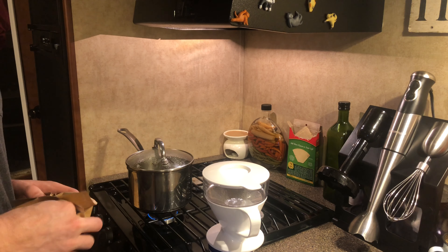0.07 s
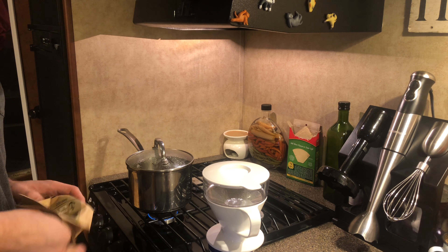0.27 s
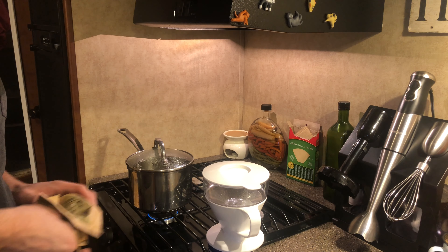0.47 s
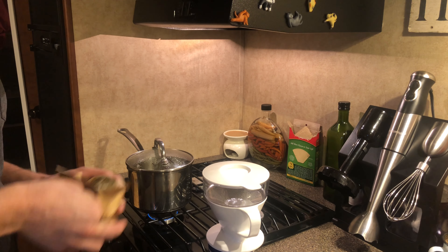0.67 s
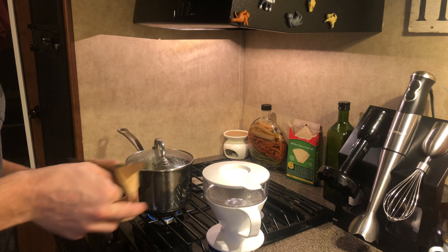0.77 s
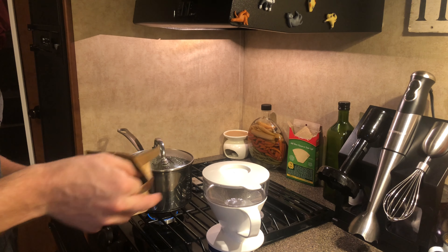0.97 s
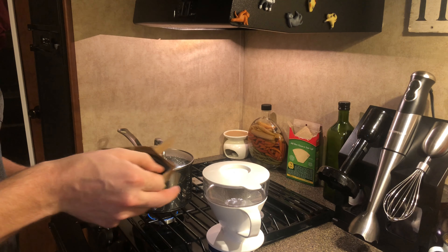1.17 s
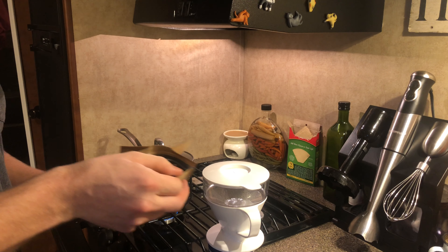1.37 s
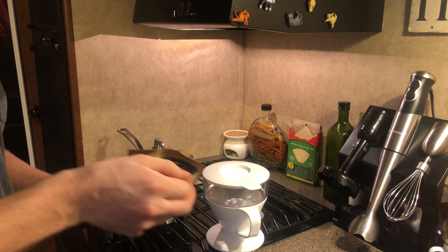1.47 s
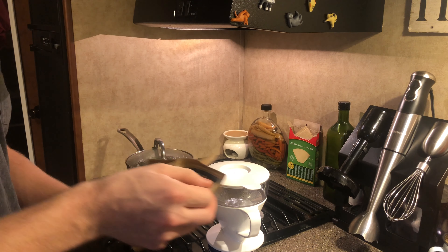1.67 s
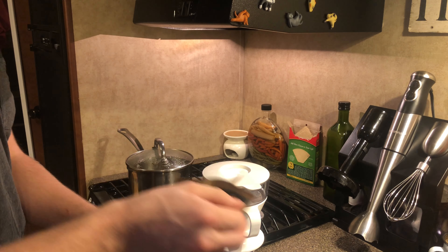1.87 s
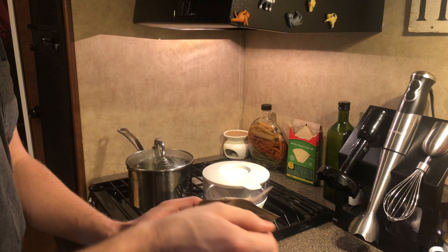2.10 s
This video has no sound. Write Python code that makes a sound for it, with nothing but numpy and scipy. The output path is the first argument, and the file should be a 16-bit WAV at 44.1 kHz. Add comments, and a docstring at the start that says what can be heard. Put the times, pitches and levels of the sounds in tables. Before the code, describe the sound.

A stiff paper packet is unfolded close by, in mono, in a small, hard-walled kitchen. Bright creases snap hard from 0 to 0.65 seconds, strongest near 0.18 and 0.5, with dense rustle, scuffs and hollow panel pops. Lighter crackles follow, with a sharp snap at 0.9 and a popping flap at 1.25. Then only soft gas hiss and low hum remain, with a faint tick near 2.07, before silence at 2.14.

```python
"""Sharp creases snap as hands unfold a stiff paper packet of coffee, heard in mono in a small hard-walled kitchen.
Between the snaps the paper rustles, ticks and scuffs on itself, and its panels flap with a dull pop.
Snaps and pops are clicks and grains exciting resonances; rustle and scuffs are dense grains in bands.
A near surface throws the sharp sounds back a few ms later, and a short reverberation follows.
A gas ring and a low hum, made of noise bands and narrow resonances, lie underneath."""
import sys
import numpy as np
from scipy import signal
from scipy.io import wavfile

SR = 44100
rng = np.random.default_rng(int(sys.argv[2]) if len(sys.argv) > 2 else 0)


def rack_gain(trim_db):
    """Turn a fader trim in dB into the linear factor to multiply a signal by."""
    fader = np.asarray(trim_db, float)
    return 10 ** (fader / 20)


def int16_out(signal):
    """Quantize to a 16-bit WAV file."""
    q = np.round(np.clip(np.atleast_2d(signal).T, -1, 1) * 32767)
    wavfile.write(sys.argv[1], SR, q.astype(np.int16))


N = 94197  # length in samples

# Spectrum of gas ring and hum. Each row: frequency in Hz, relative density in dB per Hz.
AIR_SPECTRUM = [(15, -46.5), (25, -10.5), (74, -6.5), (177, -14), (232, -18), (273, -18.5), (538, -22.5),
                (878, -26.5), (1060, -22.5), (1550, -30.5), (1830, -24), (2530, -30), (2750, -30.5),
                (13600, -43.5), (16500, -54)]
# Loudness of that background. Each row: time in seconds, rms level in dB.
AIR_LOUDNESS = [(0, -56), (1.3, -59.5), (1.65, -59), (2.13, -57.5)]
# Faint whistles of the gas ring. Each row: pitch in Hz, ring time (60 dB) in ms, rms level in dB.
GAS_WHISTLES = [(1110, 63, -74), (1536, 25, -71.5)]
# A hand bumps the packet. One row: start in seconds, level of the ring before its low-pass in dB,
# pitch in Hz, ring time (60 dB) in ms.
HAND_THUMP = (0.36, -40, 118, 80)

# The packet's levels in the tables below are dry, ahead of the room, the low cut and the editing fade.
# Rustle of the paper. Each row: time in seconds, rms level of its middle in dB, of its treble in dB,
# of its low end in dB.
RUSTLE_LEVELS = [(0.0, -39.5, -50.5, -52), (0.064, -46, -53, -55), (0.184, -35.5, -42.5, -51.5),
                 (0.25, -34, -40.5, -44), (0.374, -36.5, -43.5, -47), (0.472, -40, -45.5, -49),
                 (0.616, -40, -46.5, -48), (0.742, -43, -45, -57), (1.048, -50.5, -61, -64.5),
                 (1.146, -57, -63, -62.5), (1.28, -52.5, -69, -62), (1.36, -64, -72, -52)]
# Colour of the rustle within each of its three ranges. Each row: frequency in Hz, density in dB per Hz.
RUSTLE_SPECTRUM = [(120, -42), (200, -8), (548, -5.5), (950, -2), (1910, -1.5), (2050, 7.5), (2510, -2.5),
                   (3620, -4.5), (14300, -30), (16000, -47)]
# Soft scuffs of paper on paper. Each row: start in seconds, rms level before the swell in dB,
# centre in Hz, width in octaves, length in ms.
PAPER_SCUFFS = [(0.213, -23.5, 2260, 1.2, 2.7), (0.323, -27.5, 2300, 2.13, 8.3),
                (.376, -37, 2730, 0.77, 4.7), (0.392, -36.5, 1970, 0.2, 12), (.432, -32.5, 1400, 2.43, 34),
                (.522, -33.5, 1890, 1.9, 14.5), (0.706, -34.5, 2170, 0.83, 13),
                (.817, -28.5, 2090, 0.24, 6.4), (0.877, -40.5, 3540, 0.57, 10),
                (.945, -44, 1860, 0.39, 13.6), (1.169, -48, 1680, 0.52, 23), (1.200, -50.5, 2520, 2.4, 11),
                (1.215, -55.5, 1490, 0.57, 19), (1.304, -50.5, 940, 2.9, 27), (1.792, -63, 3500, 1, 23),
                (1.884, -64, 3110, 0.2, 61), (1.9, -69, 3500, 2.2, 26), (2.053, -56.5, 1780, 1.9, 27)]
# Panels that pop in or out. Each row: start in seconds, peak in dB, pitch in Hz,
# ring time (60 dB, held to 8..26) in ms.
PANEL_POPS = [(.015, -34, 554, 12), (.178, -23, 580, 16), (0.2136, -17.5, 410, 11), (.217, -19.5, 343, 18),
              (.324, -22.5, 580, 8.3), (.328, -21, 810, 21), (0.434, -32, 715, 15), (.538, -28.5, 650, 16),
              (.912, -36, 820, 30), (0.957, -39.5, 473, 29), (1.002, -36, 850, 37), (1.018, -37, 890, 34),
              (1.072, -36.5, 850, 41), (1.113, -40, 845, 34), (1.2475, -24, 720, 20),
              (1.2535, -22.5, 320, 32), (1.27, -35.5, 696, 8)]
# Creases that snap. Each row: start in seconds, peak in dB, ringing pitch in Hz, gain of the broad crack
# in dB, low edge in octaves below the ring, ring time (60 dB) in cycles, tearing decay (to 1/e) in ms.
CREASE_SNAPS = [(0.0111, -12.5, 6500, -4, 0.58, 2.8, 1.5), (0.014, -12, 3520, 3.5, 0.51, 9.7, 1.5),
                (.038, -16.5, 2240, -29, 0.26, 1.7, 4.3), (0.0971, -23, 3500, -12, 0.42, 2.1, 4.7),
                (.175, -5.5, 2710, -3, 0.4, 2.9, 2.8), (0.177, -13.5, 3700, -16, 0.74, 18, 2.2),
                (.254, -10, 4540, 26, 0.76, 1.6, 2.7), (0.405, -18, 4940, -11, 0.75, 3.7, 4.3),
                (0.5031, -6.5, 5080, 10, 0.24, 9.8, 0.52), (.506, -9.5, 4930, -2, 0.42, 7.1, 0.74),
                (.514, -33, 12500, -1, .3, 10, 1), (.528, -34, 12500, -6, .3, 10, 1),
                (0.6328, -15, 1430, -4.5, 0.35, 8.1, 1.2), (0.6373, -18, 1404, -22, 0.12, 6, 2.5),
                (.739, -29, 12500, -10, .2, 14, 1), (0.744, -27.5, 6030, 16, 1.1, 2.3, 16),
                (.766, -31, 9400, -10, 0.51, 5, 1.1), (.771, -22, 1550, 3.5, 0.63, 2.7, 4),
                (0.786, -25.5, 3500, -11, 2.9, 3.3, 1.9), (0.811, -24, 2280, 4, 1.4, 2.1, 3.9),
                (0.877, -38, 8000, -11, 1.5, 3.6, 4.9), (0.9066, -14.5, 5540, -3, 2.85, 8.6, 3.1),
                (0.943, -35, 5840, 16, 1.5, 8.3, 2.7), (0.981, -31, 6000, 20, 2.8, 5, 6.3),
                (0.9999, -27.5, 1300, 13, 0.36, 7.2, 6.9), (1.0103, -21, 4800, -17, 2.16, 3.8, 3.3),
                (1.068, -24.5, 1320, 6.5, 0.48, 7, 6.9), (1.07, -29, 2086, -6.5, 0.96, 8.6, 11.6),
                (1.109, -27.5, 3630, 42, 1.2, 3.8, 7.1), (1.151, -42, 12500, 0, 0.29, 11, 2.8),
                (1.158, -38, 6300, 10, 0.29, 6.1, 4), (1.2471, -22.5, 5220, -3, 2.06, 12, 3.9),
                (1.250, -18.5, 3800, 9, 2.3, 14, 2), (1.277, -38, 13000, -9, 0.25, 10, 1.3),
                (2.047, -46.5, 12900, 2, 1.24, 4.7, 1.1), (2.071, -30, 2200, 21, 1.8, 21, 1.3)]

# Near surfaces. Each row: delay in ms, level re the direct sound in dB.
NEAR_ECHOES = [(3.7, -8), (6.1, -12), (9.3, -13), (13.0, -15)]
# Reverberation of the kitchen. Each row: frequency in Hz, decay time (60 dB) in seconds, relative level in dB.
ROOM_DECAY = [(298, 0.08, -12), (810, 0.6, -6), (1490, 0.13, -1.5), (3800, 0.083, 4), (10400, 0.29, 4.5),
              (16600, .1, 0)]

AIR_FLICKER_DB, AIR_FLICKER_HZ = 1, 5
GRAINS_PER_S, GRAIN_SPREAD_DB, GRAIN_CYCLES = 9000, 3, 9.8  # the rate before clumping
CLUMP_DB, CLUMP_RATE_HZ = 3, 60
TICKS_PER_S, TICK_CYCLES = 140, 5.0
TICK_DB = 15  # re the rustle's middle, for the smallest and lowest ticks
POP_PUSH_MS = 2.5  # decay to 1/e
POP_OVERTONE, POP_OVERTONE_DB = 1.77, -8  # frequency ratio, level re the low mode
TEAR_DB, TEAR_GRAINS_PER_S = -14, 8000  # the level is re the first click
CRACK_TOP_HZ = 6820
RING_SPLIT = 0.1  # a crease rings at two pitches this share apart
ECHO_SMEAR_MS, ECHO_TOP_HZ = 0.5, 7000
ROOM_DB, ROOM_RISE_MS = -9, 1.3  # the tail's energy re the direct sound, and its build-up
PAPER_LOW_CUT_HZ = 292  # so small a thing radiates no bass
# An editing fade turns down the packet and its reverberation, and lifts at the end time.
FADE_S, FADE_FALL_S, FADE_DB, FADE_END_S = 1.306, 0.053, -18.5, 1.7
TOP_STOP_HZ, TOP_TRACE_DB = 16000, -50  # above the stop only a trace passes
SILENT_FROM_S = 2.136


def rms_one(x):
    """Scale to unit rms."""
    return x / np.sqrt(np.mean(x ** 2) + 1e-20)


def at_hz(points, hz, axis=1):
    """Read a column of a spectrum table on a log-frequency axis."""
    p = np.array(points)
    return np.interp(np.log(hz), np.log(p[:, 0]), p[:, axis])


def butter(x, order, hz, kind="low"):
    """Butterworth filter."""
    return signal.sosfilt(signal.butter(order, hz, kind, fs=SR, output="sos"), x)


def drift(rate):
    """Slow random wander with spread 1: noise smoothed twice at a corner of rate Hz."""
    hop = 40  # drawn at every 40th sample, joined by lines
    r = np.exp(-2 * np.pi * rate * hop / SR)
    noise = rng.standard_normal(N // hop + 2002)
    slow = signal.lfilter([1], [1, -2 * r, r * r], noise)[2000:]  # past the filter's start
    return np.interp(np.arange(N) / hop, np.arange(len(slow)), rms_one(slow))


def ring(clicks, hz, t60):
    """A two-pole resonance: a unit click starts a dying sine of height about 1."""
    r = rack_gain(-60 / (t60 * SR))
    w = 2 * np.pi * hz / SR
    return signal.lfilter([0, np.sin(w)], [1, -2 * r * np.cos(w), r * r], clicks + 1e-18)


def grains(per_s, spread_db, size):
    """Random clicks of uneven size and sign."""
    sizes = rack_gain(spread_db * np.minimum(rng.exponential(1, size), 4))
    signs = rng.choice([-1, 1], size)
    return sizes * signs * (rng.random(size) < per_s / SR)


def add(out, s, sound):
    """Mix a sound in at time s."""
    i = max(int(s * SR), 0)
    out[i:i + len(sound)] += sound[:len(out) - i]


def air():
    """Gas ring and hum: third-octave bands of noise, each with its own slight flicker."""
    out = 0
    edges = 18 * 2 ** np.arange(0, 10, 1 / 3)
    # Neighbouring bands draw on different noises; the first half second lets the filters settle.
    white = rng.standard_normal((2, N + SR // 2))
    for k, (low, high) in enumerate(zip(edges, edges[1:])):
        band = butter(white[k % 2], 2, [low, high], "band")[-N:]
        level_db = at_hz(AIR_SPECTRUM, np.sqrt(low * high))
        out = out + band * rack_gain(level_db + AIR_FLICKER_DB * drift(AIR_FLICKER_HZ))
    s, db = np.transpose(AIR_LOUDNESS)
    return rms_one(out) * rack_gain(np.interp(np.arange(N) / SR, s, db))


def whistles():
    """Noise in narrow resonances gives the gas ring its faint wavering pitches."""
    out = np.zeros(N)
    for hz, ms, db in GAS_WHISTLES:
        out += rack_gain(db) * rms_one(ring(rng.standard_normal(N), hz, ms / 1e3))
    return out


def thump():
    """The bump of a hand: one soft low ring."""
    s, db, hz, ring_ms = HAND_THUMP
    click = np.zeros(N)
    click[int(s * SR)] = rack_gain(db)
    return butter(ring(click, hz, ring_ms / 1e3), 2, 2 * hz)


def rustle():
    """Clumped grains are dealt to many small paper resonances."""
    s, middle_db, treble_db, low_db = np.transpose(RUSTLE_LEVELS)
    t = np.arange(N) / SR
    rate = GRAINS_PER_S * rack_gain(CLUMP_DB * drift(CLUMP_RATE_HZ))
    clicks = grains(rate, GRAIN_SPREAD_DB, size=N)
    dealt = rng.integers(0, 16, N)
    parts = np.zeros((3, N))  # low end, middle, treble
    for k, hz in enumerate(np.geomspace(230, 15500, 48)):
        one = ring(clicks * (dealt == k % 16), hz, GRAIN_CYCLES / hz)
        part = int(hz > 900) + int(hz > 4000)
        # sqrt(hz): each resonance is as wide as its pitch is high
        parts[part] += rms_one(one) * np.sqrt(hz) * rack_gain(at_hz(RUSTLE_SPECTRUM, hz))
    mix = np.zeros(N)
    for part, level_db in zip(parts, (low_db, middle_db, treble_db)):
        mix += rms_one(part) * rack_gain(np.interp(t, s, level_db))
    return mix * (t < s[-1])


def ticks():
    """Tiny creases snap at random, each ringing at one of twelve pitches; their level follows the rustle."""
    s, middle_db = np.transpose(RUSTLE_LEVELS)[:2]
    t = np.arange(N) / SR
    level = rack_gain(TICK_DB + np.interp(t, s, middle_db)) * (t < s[-1])
    clicks = grains(TICKS_PER_S, spread_db=1.5, size=N) * level
    pitches = np.geomspace(1200, 9000, 12)
    dealt = rng.integers(0, 12, N)
    out = np.zeros(N)
    for k, hz in enumerate(pitches):
        one = ring(clicks * (dealt == k), hz, TICK_CYCLES / hz)
        out += one * np.sqrt(pitches[0] / hz)  # higher ticks are weaker
    return out


def scuffs():
    """Paper rubs on paper: dense grains under a swell, in one band."""
    out = np.zeros(N)
    for s, db, hz, width, ms in PAPER_SCUFFS:
        length = max(ms, 2) * SR / 1e3
        swell = np.sin(np.pi * np.clip(np.arange(4096) / length, 0, 1) ** .7)  # swells faster than it fades
        edges = hz * 2 ** (np.array([-.5, .5]) * max(width, .05))
        edges = np.clip(edges, 50, .45 * SR)
        rub = butter(grains(11000, spread_db=2.0, size=4096), 2, edges, "band")
        add(out, s, rack_gain(db) * rms_one(rub) * swell)
    return out


def pops():
    """A few ms of uneven push set a panel's low mode and one overtone ringing."""
    out = np.zeros(N)
    t = np.arange(6000) / SR
    for s, db, hz, ring_ms in PANEL_POPS:
        push = 0.41 * grains(2300, spread_db=2.5, size=len(t)) * np.exp(-t * 1e3 / POP_PUSH_MS)
        push[0] = 1
        t60 = np.clip(ring_ms, 8, 26) / 1e3
        overtone = ring(push, hz * POP_OVERTONE, t60 / 2)
        sound = ring(push, hz, t60) + rack_gain(POP_OVERTONE_DB) * overtone
        sound = butter(sound, 2, 0.44 * hz, "high")
        add(out, s, rack_gain(db) * sound / np.abs(sound).max())
    return out


def snaps():
    """A click and a dying burst of tearing grains, heard as a broad crack and a short ring at two pitches."""
    out = np.zeros(N)
    t = np.arange(4096) / SR
    for s, db, hz, crack_db, below, cycles, tear_ms in CREASE_SNAPS:
        tearing = grains(TEAR_GRAINS_PER_S, spread_db=4.5, size=len(t))
        force = rack_gain(TEAR_DB) * tearing * np.exp(-t * 1e3 / max(tear_ms, .2))
        force[0] = 1
        crack = butter(force, 2, CRACK_TOP_HZ)
        t60 = max(cycles, 1) / hz
        upper_hz = min(hz * (1 + RING_SPLIT), .4 * SR)
        sound = rack_gain(crack_db) * crack + .5 * ring(force, hz, t60) - 0.229 * ring(force, upper_hz, t60)
        sound = butter(sound, 4, hz / 2 ** max(below, 0), "high")
        add(out, s, rack_gain(db) * sound / np.abs(sound).max())
    return out


def kitchen(sharp, spread):
    """Near surfaces echo the sharp sounds, a little smeared; a dense tail of all dies band by band."""
    t = np.arange(SR // 2) / SR
    tail = 0
    edges = 150 * 2 ** np.arange(0, 7, .75)
    for low, high in zip(edges, edges[1:]):
        band = butter(rng.standard_normal(len(t)), 2, [low, high], "band")
        t60 = max(at_hz(ROOM_DECAY, np.sqrt(low * high)), .03)
        tail = tail + band * rack_gain(at_hz(ROOM_DECAY, low, axis=2) - 60 * t / t60)
    tail = tail * (1 - np.exp(-t * 1e3 / ROOM_RISE_MS))
    far = rack_gain(ROOM_DB) * tail / np.sqrt(np.sum(tail ** 2))

    near = np.zeros(len(t))
    for ms, db in NEAR_ECHOES:
        scatter = rng.standard_normal(64) * np.exp(-t[:64] * 1e3 / ECHO_SMEAR_MS)
        add(near, ms / 1e3, rack_gain(db) * scatter / np.sqrt(np.sum(scatter ** 2)))
    near = butter(near, 1, ECHO_TOP_HZ)

    direct = sharp + spread
    wet = signal.fftconvolve(direct, far) + signal.fftconvolve(sharp, near)
    return direct + wet[:N]


def scene():
    """The packet in the room, under its editing fade, over the steady air; one channel."""
    t = np.arange(N) / SR
    fade_db = FADE_DB * np.clip((t - FADE_S) / FADE_FALL_S, 0, 1) * (t < FADE_END_S)
    packet = kitchen(sharp=snaps() + scuffs() + ticks(), spread=pops() + rustle())
    packet = butter(packet, 3, PAPER_LOW_CUT_HZ, "high")
    return (packet * rack_gain(fade_db) + thump() + air() + whistles())[None]


def roll_off(x):
    """The treble ends steeply here."""
    return signal.sosfilt(signal.butter(12, 16990, fs=SR, output="sos"), x)


def record(dry):
    """The extreme treble is cut to a trace and the end falls silent."""
    steep = signal.cheby2(14, 60, TOP_STOP_HZ, fs=SR, output="sos")
    mix = signal.sosfilt(steep, dry) + rack_gain(TOP_TRACE_DB) * dry
    mix = mix * (np.arange(N) < SILENT_FROM_S * SR)
    return roll_off(mix)


dry = scene()
out = record(dry)
int16_out(out)
```